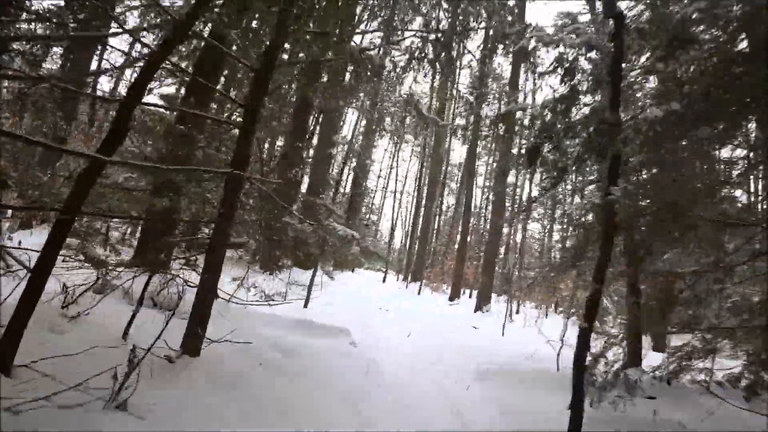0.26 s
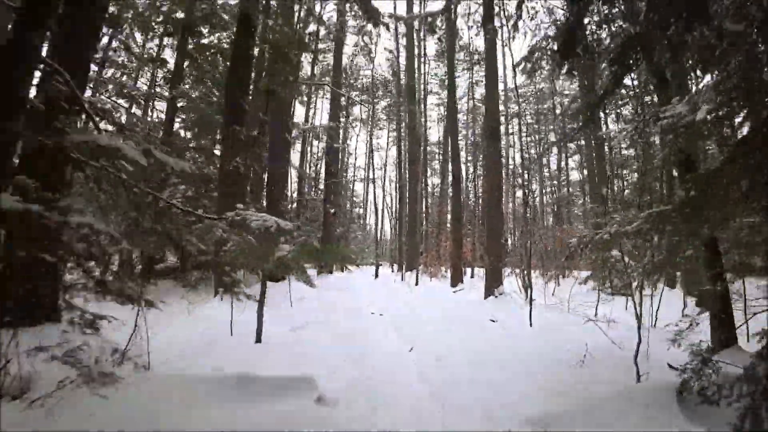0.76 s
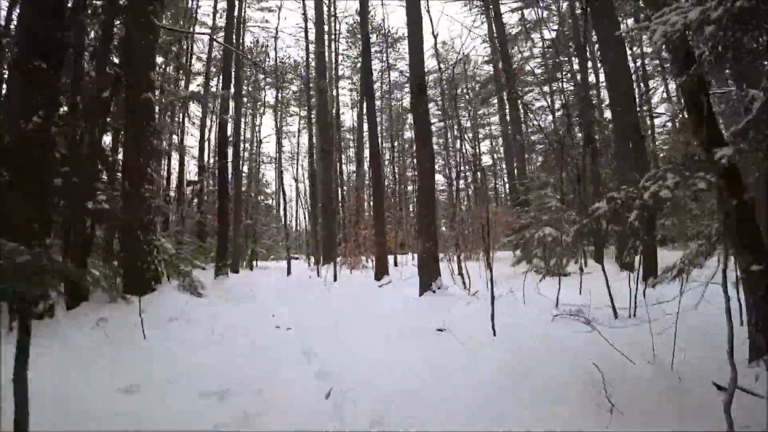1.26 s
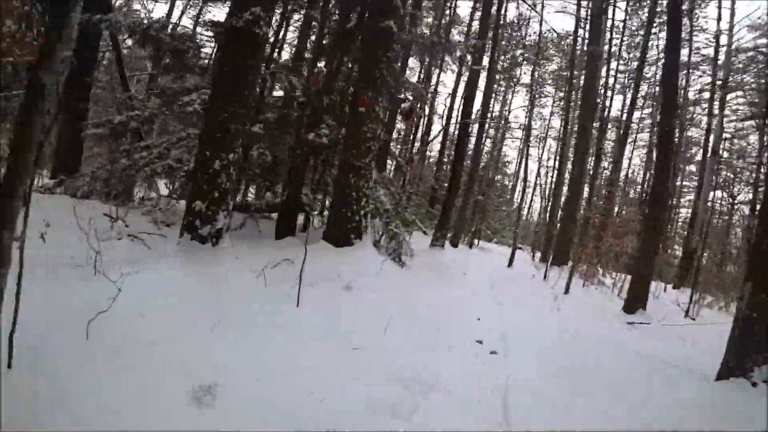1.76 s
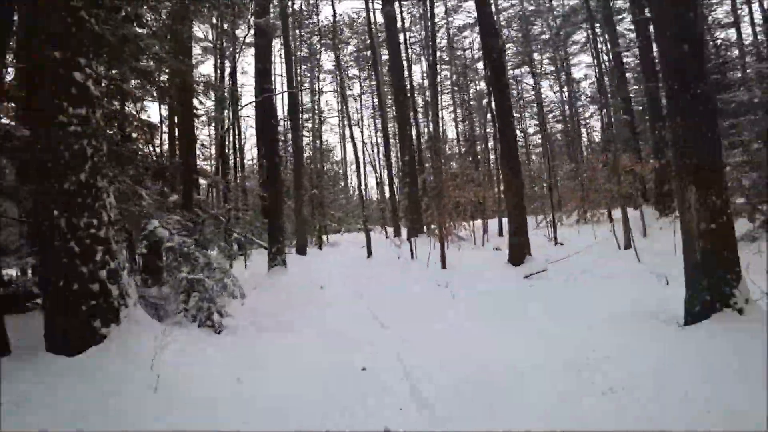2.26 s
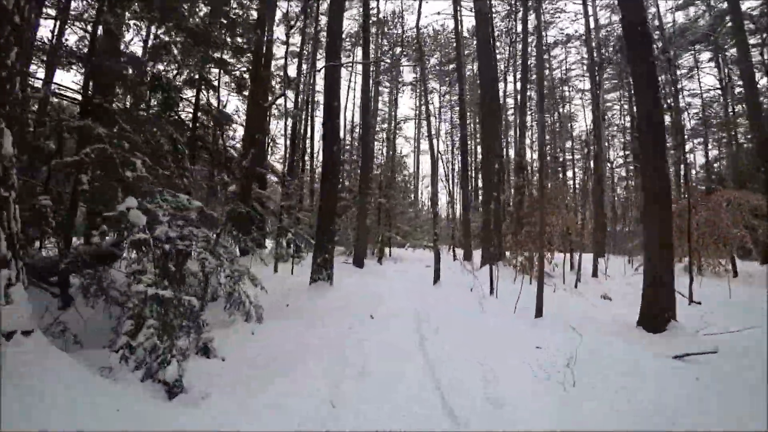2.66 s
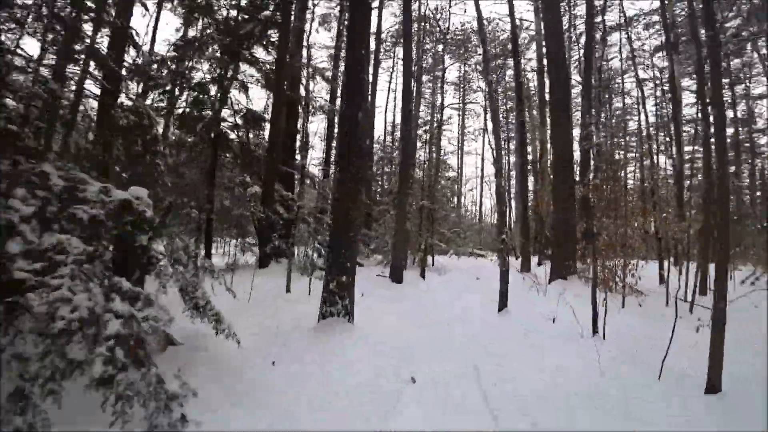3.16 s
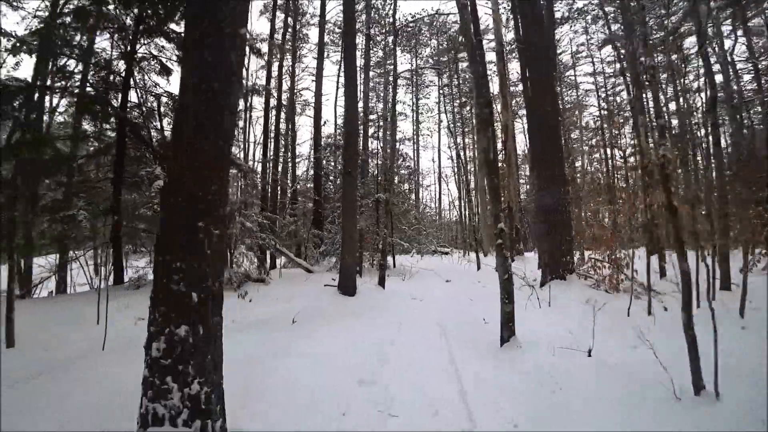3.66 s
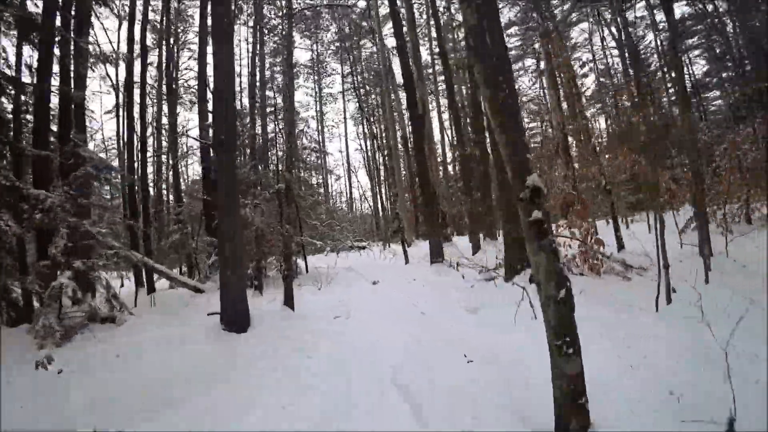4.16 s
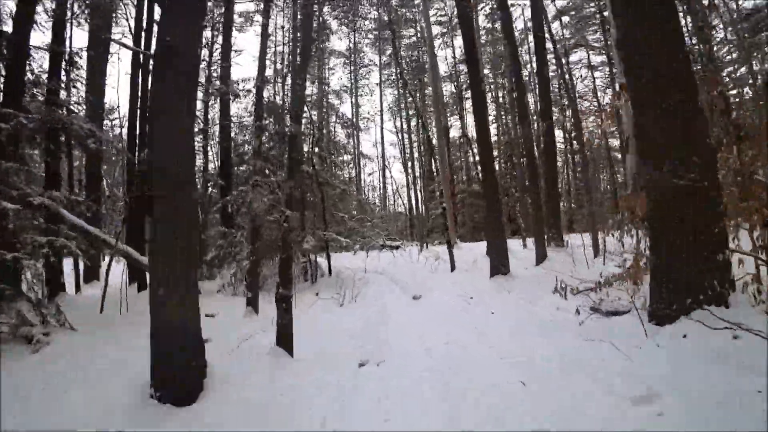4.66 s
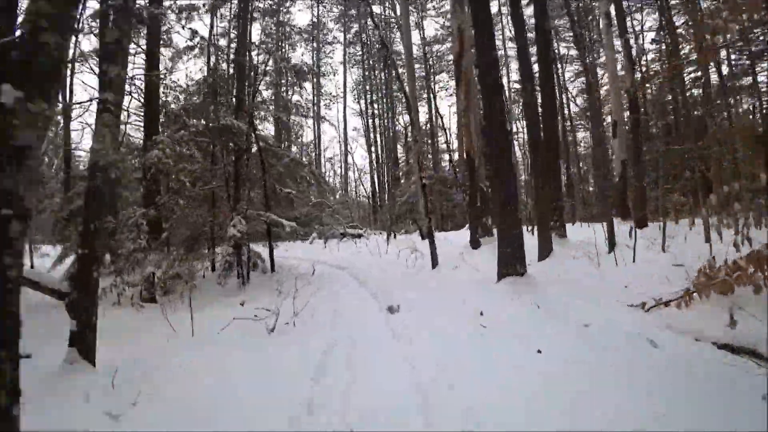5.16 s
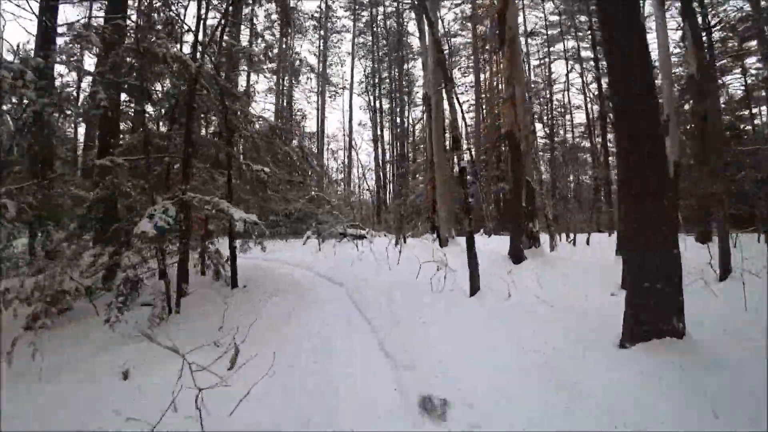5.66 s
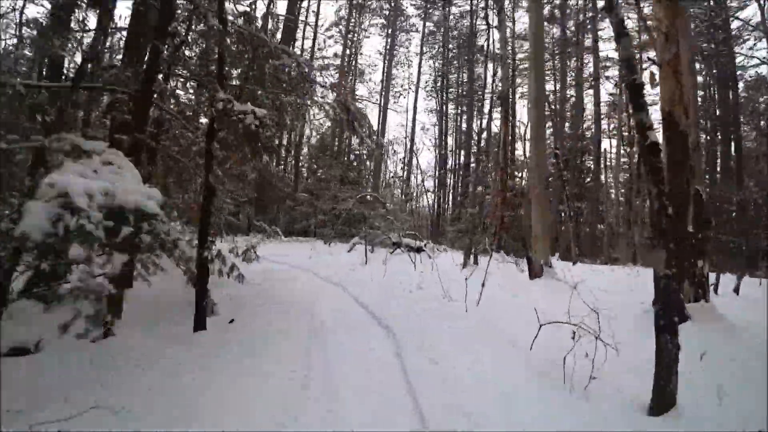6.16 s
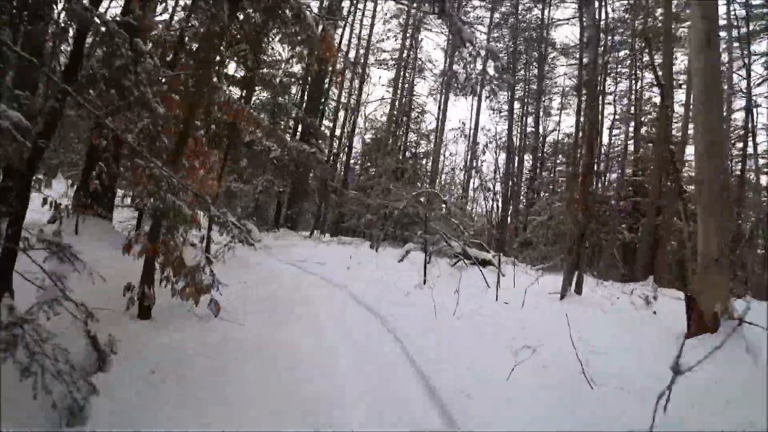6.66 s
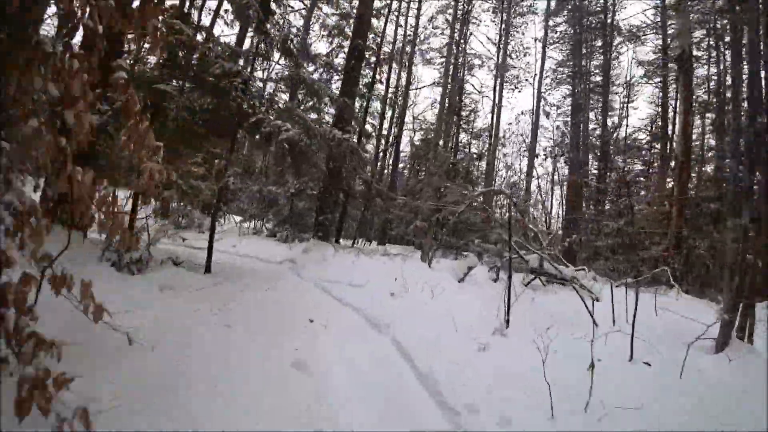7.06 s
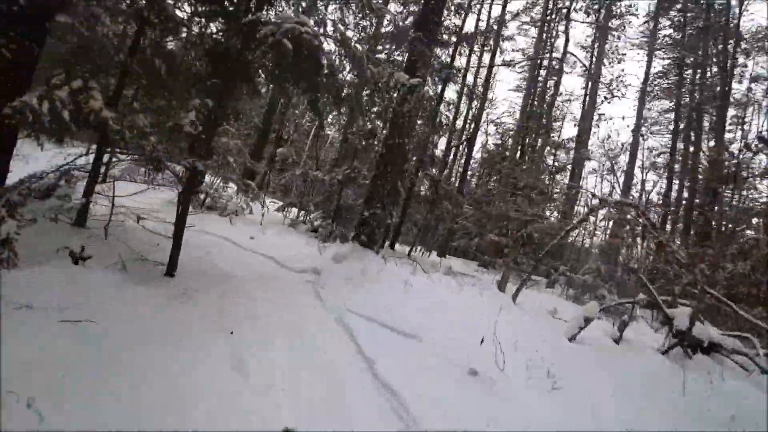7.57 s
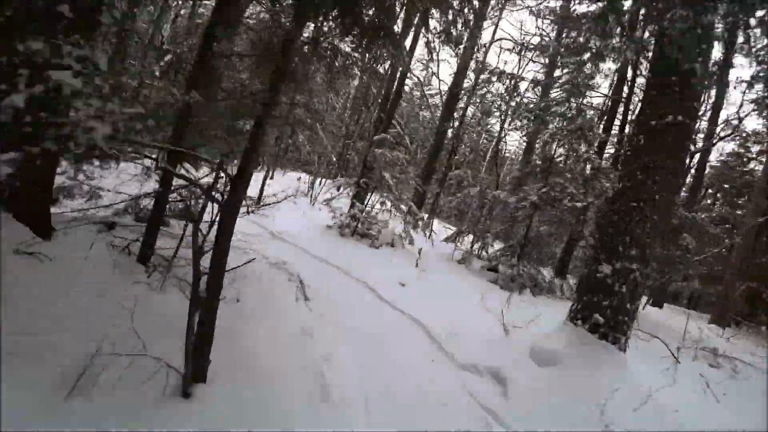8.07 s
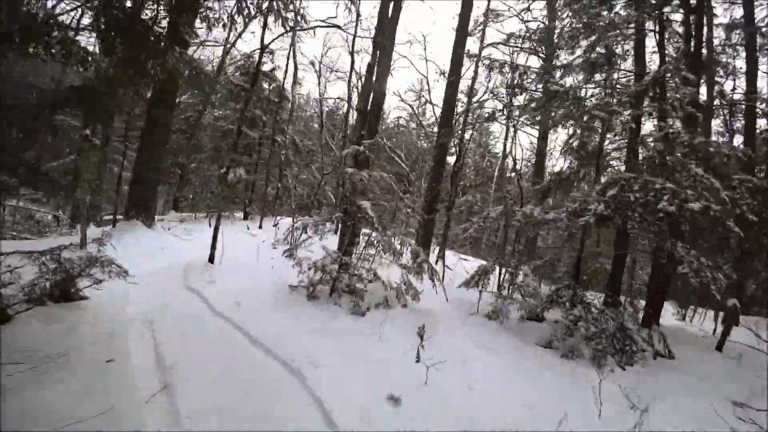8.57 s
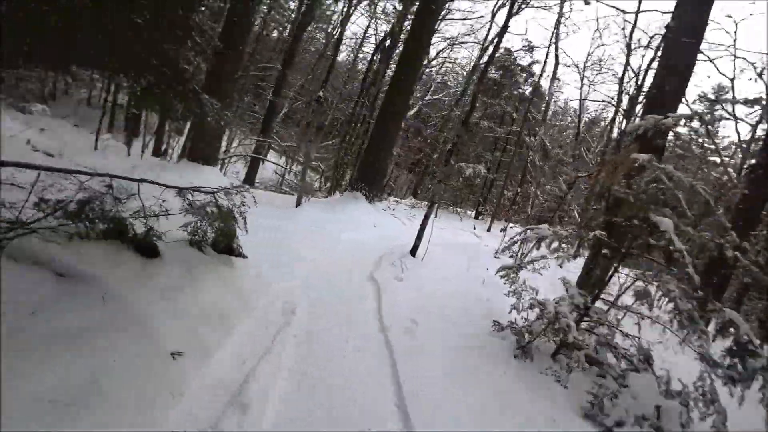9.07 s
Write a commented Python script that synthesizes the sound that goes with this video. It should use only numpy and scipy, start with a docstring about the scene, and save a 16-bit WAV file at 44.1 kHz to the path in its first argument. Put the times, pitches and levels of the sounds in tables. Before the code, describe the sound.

Close, frame-borne sound of a bike on a snowy forest trail: continuous heavy low rumble, irregular bumps and muffled crunch, rough where the loudest swings clip. A tiny squeak and scratch open it, followed by isolated knocks. Short bursts of even freewheel clicks appear in the second half, then steady brake friction with sharp gritty scratches, a short low groan and several final rattles.

```python
"""A bicycle rolls over packed snow, heard through a camera clamped to the frame, so metal carries nearly all sound.
All along, a deep note sways and snow thumps and crunches; noise shakes the ringing modes of the housing.
First the brake disc squeaks and grit scratches in short sine slips; then come knocks (noise bursts) and overloads.
From 4.2 to 7.5 s the freewheel ratchet clicks in even runs. From 7.5 s the brake rubs (noise through the housing);
grit scratches again at 8.1 s, the fork groans (a gliding sine) near 8.5 s, and knocks crowd the end."""
import sys
import numpy as np
from scipy import signal
from scipy.fft import rfft, irfft
from scipy.io import wavfile
from scipy.ndimage import uniform_filter1d, minimum_filter1d

SR = 44100
rng = np.random.default_rng(int(sys.argv[2]) if len(sys.argv) > 2 else 0)


def wav_out(sig):
    """Save sig, one row per channel (or a flat mono array), as 16-bit PCM at SR to the path in sys.argv[1]."""
    wavfile.write(sys.argv[1], SR, np.round(np.clip(np.atleast_2d(sig).T, -1, 1) * 32767).astype(np.int16))


N = 411012

# A short squeak of the disc. Each row: time in seconds, pitch in Hz, level in dB.
SQUEAK = [(0.05, 1047, -50), (0.07, 1040, -40), (0.1, 1054, -40), (0.145, 1060, -54)]
# Hiss of grit caught under the pad, one list per scratch.
# Each row: time in seconds, hiss in dB before flutter and the gains of each side.
GRIT_HISS = [
    [(0.06, -86), (0.106, -63), (0.11, -69), (0.18, -77)],
    [(8.08, -81), (8.114, -72), (8.134, -46.5), (8.158, -62), (8.298, -56), (8.316, -66), (8.4, -73)],
]
# Hard slips of the grit. Each row: start in seconds, peak in dB before the gains of each side, pitch in Hz.
GRIT_SLIPS = [(0.103, -50, 5840), (0.1351, -50, 5860), (8.1335, -38, 5850), (8.147, -45, 6430),
              (8.208, -39, 6200), (8.2167, -37, 6140), (8.2477, -41, 6240), (8.2885, -35, 6060),
              (8.2952, -41, 6160), (8.3584, -51, 6472)]
# Brake pad on the disc. Each row: time in seconds, rub in dB within the disc's band, before flutter and trim.
BRAKE_RUB = [(7.545, -88.5), (7.553, -57.5), (7.62, -54), (7.714, -53), (8.108, -54), (8.4, -52),
             (8.604, -52), (8.82, -52), (9.002, -56), (9.17, -63), (9.24, -86.5)]
# Bands the disc favours. Each row: centre in Hz, width in Hz, boost in dB before it adds to the plain path.
DISC_MODES = [(1950, 340, -4), (3330, 770, 4.5), (1100, 190, 2)]
# Extra drive of the first disc mode. Each row: time in seconds, drive in dB against the rub.
BRAKE_BITE = [(7.55, -2.5), (8.25, 3), (8.55, -11)]
# Throbs of the braked fork. Each row: time in seconds, pitch in Hz, level in dB before the gains of each side.
FORK_GROAN = [(8.44, 268.4, -50), (8.47, 268.8, -30), (8.49, 272, -17), (8.515, 272, -28.5),
              (8.54, 265, -16.5), (8.575, 280.6, -59), (8.615, 286, -10.5), (8.645, 286, -30),
              (8.68, 289, -64)]
# Runs of ratchet clicks. Each row: first click in seconds, last click in seconds, rough gap in seconds,
# peak in dB before scatter.
RATCHET_RUNS = [(4.182, 4.4157, .058, -41), (4.468, 4.569, .054, -44), (5.303, 5.415, .055, -38.5),
                (5.7154, 6.1669, .0501, -42.5), (6.538, 6.691, .051, -42), (7.316, 7.473, .0516, -41)]
# Knocks on the frame. Each row: start in seconds, peak in dB, body in dB against that peak, body pitch in Hz,
# edge in dB against that peak.
KNOCKS = [(0.203, -48, 5, 1110, -4), (0.242, -58, 11, 904, -10), (1.0052, -43.5, 15, 1105, -26),
          (1.0905, -56, 27.5, 980, -11), (1.1005, -61, 31, 800, -9), (1.1035, -59, 33, 950, -9),
          (1.109, -57, 36, 620, -17), (1.556, -41, 4, 1000, -14), (1.635, -38.5, 4, 999, -18),
          (1.686, -46, 3, 899, -8.5), (2.1949, -42, -1, 902, -23), (2.4352, -41.5, 6, 905, -40),
          (2.5262, -41.5, -3, 906, -13), (3.023, -35.5, 0, 900, -28), (3.4194, -38, -10, 897, -35.5),
          (3.5254, -31, 8.5, 860, -8.5), (3.9250, -31, -2, 1199, -7.5), (3.9315, -41, 5, 1095, -8),
          (4.4753, -37, 9.5, 900, -27), (5.0674, -48, -6, 1001, -5), (6.4366, -46, -3, 1097, -13),
          (7.528, -55, 23.5, 702.4, -21), (7.5522, -52.5, 7, 1020, -9), (7.741, -54, 12, 900, -16),
          (8.747, -40, 7, 942, -21), (8.766, -40, 15, 1046, -23.5), (8.793, -45, 18, 950, -23),
          (8.811, -42, 14, 1053, -18), (8.905, -48, 18, 982, -21), (9.126, -45.5, 12.5, 1216, -12),
          (9.139, -33, 9, 1030, -18.5), (9.1704, -43, 17.5, 888, 3), (9.2045, -46, 6, 895, -2),
          (9.218, -58, 0, 900, 1), (9.2618, -36.5, 9, 796.7, -17)]
# Sway of the clamp. Each row: time in seconds, level in dB before wavering, levelling off and the gains of each side.
SWAY_LEVEL = [(0.0, -15.5), (0.04, -38), (0.12, -13), (0.22, -21), (0.81, -25), (0.84, -15), (0.92, -27),
              (1.0, -18), (1.14, -21), (1.49, -13.5), (1.54, -22), (1.87, -6), (1.98, -24), (2.02, -12.5),
              (2.27, -10.5), (2.33, -22.5), (2.57, -19.5), (2.61, -21.5), (2.88, -10), (3.0, -16),
              (3.13, -20.5), (3.19, -13.5), (3.44, -15), (3.49, -28), (3.58, -33), (3.61, -13.5),
              (3.71, -33), (3.79, -9.5), (3.85, -29), (3.9, -15), (3.94, -22.5), (4.1, -14.5), (4.55, -26),
              (4.62, -9.5), (4.87, -14), (4.91, -26), (5.1, -10.5), (5.67, -18), (5.71, -25), (5.9, -16),
              (5.95, -25), (6.03, -17), (6.13, -22), (6.2, -14), (6.4, -19.5), (6.46, -10.5), (6.59, -21),
              (6.76, -10.5), (6.91, -35), (6.96, -16.5), (7.12, -6.5), (7.22, -27), (7.53, -11),
              (7.66, -16.5), (7.84, -25), (7.91, -18.5), (7.98, -32), (8.14, -14), (8.34, -17), (8.38, -11),
              (8.55, -29), (8.66, -14.5), (9.04, -9), (9.09, -21.5), (9.26, -13), (9.31, -13)]
# Pitch of the sway. Each row: time in seconds, pitch in Hz.
SWAY_PITCH = [(0.0, 34.9), (0.57, 39.95), (2.23, 41.22), (2.7, 44.19), (3.5, 40.11), (3.63, 36.5),
              (4.96, 42.12), (8.2, 39.11), (8.49, 40.99), (9.32, 41)]
# Roughness of the trail. Each row: time in seconds, then small lumps, long ripples and crunch,
# each in dB that count only against the other rows of their column.
TRAIL = [(0.0, -12.5, -29.5, -34.5), (0.15, -18, -24.5, -38.5), (0.26, -11.5, -24, -33.5),
         (0.54, -18.5, -29.5, -39.5), (0.68, -17.5, -19.5, -37), (0.78, -11.5, -25.5, -33),
         (1.04, -17.5, -30, -36), (1.47, -13.5, -19.5, -31.5), (1.55, -15, -21.5, -32),
         (1.78, -12.5, -18, -34.5), (1.82, -19, -23, -39.5), (1.95, -18, -25, -36),
         (2.14, -15.5, -20.5, -35.5), (2.57, -16.5, -23, -37), (3.22, -15, -18, -34),
         (3.27, -10.5, -18.5, -32), (3.5, -17.5, -26, -34.5), (3.73, -15, -25, -32),
         (3.81, -15.5, -19.5, -32.5), (3.96, -16.5, -23, -33), (4.09, -11, -19, -31.5),
         (4.29, -19.5, -21.5, -34), (4.44, -14.5, -23, -32.5), (4.63, -10, -15.5, -31.5),
         (4.7, -17.5, -17.5, -35), (4.87, -15.5, -24.5, -34.5), (4.97, -11.5, -14.5, -31.5),
         (5.06, -12.5, -19, -35.5), (5.13, -18.5, -27, -37.5), (5.22, -20.5, -23.5, -36),
         (5.35, -13.5, -16.5, -34.5), (5.49, -12.5, -17, -33), (5.71, -14.5, -22.5, -37),
         (5.88, -13, -13.5, -31.5), (6.08, -11.5, -22.5, -37), (6.27, -10.5, -14.5, -29),
         (6.39, -13.5, -23.5, -37), (6.56, -11.5, -15, -32.5), (6.61, -11, -21, -30.5),
         (6.74, -13.5, -15.5, -32), (6.88, -16, -26.5, -33), (6.99, -9, -18.5, -30), (7.16, -21, -23, -38),
         (7.22, -20, -29.0, -36.5), (7.33, -11, -20.5, -34), (7.57, -17.5, -18.5, -34.5),
         (7.83, -14, -19, -32.5), (7.92, -17, -14.5, -36), (7.97, -19.5, -17.5, -34),
         (8.14, -12.5, -19.5, -30), (8.38, -16.5, -20.5, -31), (8.48, -9, -21.5, -29),
         (8.55, -12, -30, -27.5), (8.65, -9, -22.5, -28), (8.81, -15, -20, -29), (8.99, -16.5, -23.5, -35),
         (9.13, -17, -18.5, -34), (9.2, -15, -22, -36.5), (9.26, -6.5, -21.5, -34.5),
         (9.31, -9, -25, -32.5)]
# Ringing modes of the housing. Each row: centre in Hz, width in Hz before a common widening, left level in dB per Hz,
# right level in dB per Hz, lead of the right side in radians, likeness of the two sides from 0 to 1.
HOUSING_MODES = [(56.2, 22, -41.5, -40, -2, 0.1), (121, 39.5, -46, -38.5, -3, 0.83),
                 (182.6, 50.0, -43, -40, -2.5, 0.77), (230, 37, -40.5, -34.5, -3, 0.93),
                 (267.8, 47.4, -35, -32, -2.5, 0.99), (296.7, 44, -38.5, -35.5, -3, 0.95),
                 (375.5, 56, -55.5, -53, -3, 0.4), (458, 120, -67, -60, -3, 0.6),
                 (557.2, 84, -66.5, -56, -2.5, 0.4), (618.3, 81, -63, -55.5, -3, 0.7),
                 (818.6, 120, -67, -66.5, -2, 0.64), (873.5, 85, -60, -61, 3, 0.78),
                 (1035, 139, -67, -67.5, -1.5, 0.21), (1311, 100, -74.5, -69, 4, 0.89),
                 (1470, 250, -82, -82.5, -2, 0.6), (1751, 89, -76.5, -82.5, -2, 0.95),
                 (1870, 140, -77, -75, -2, 0.9), (2090, 500, -91.5, -93, -1.74, 0.9),
                 (2490, 170, -91, -90.5, -1.2, 0.95), (3095, 140, -99.5, -99.5, -0.5, 0.7),
                 (3413, 290, -99.2, -99.2, 0.1, 0.5), (3680, 150, -99.4, -101, 0.5, 0.7),
                 (4480, 160, -115.1, -113.7, -2, 0.93), (5170, 900, -117, -114.5, -4, 0.8),
                 (6430, 1600, -126, -121, 0.6, 0.5)]
# Rumble crests that reach or near overload, one list for the left side and one for the right.
# Each row: rough time of the crest in seconds, its size in dB over full scale.
OVERLOAD_CRESTS = [
    [(1.486, 2), (1.691, 0.5), (1.794, 0.7), (2.947, 0.5), (3.298, 0.3), (4.077, 1), (4.090, 2),
     (4.098, 0.4), (4.18, 0.5), (5.068, 0.2), (5.320, 0.4), (5.329, 0), (5.362, 1.4), (5.381, -0.8),
     (5.505, 0.5), (6.446, -1.5), (6.708, -1.3), (6.765, 0.6), (6.774, 1.8), (6.778, 0.8), (7.055, 0.7),
     (8.388, -0.7), (8.793, 1.5)],
    [(0.204, 1), (0.2085, 1.5), (1.448, 0.3), (1.607, 1), (1.750, 0.5), (1.764, 2.5), (2.923, 1.5),
     (3.253, 0.5), (3.267, 1.5), (3.283, 1.6), (3.309, 1.5), (3.785, 2.3), (3.816, 2), (4.063, 0.4),
     (4.083, 0.1), (4.138, 1.8), (4.615, 2.2), (5.077, 1), (5.085, -0.6), (5.134, 1), (5.520, 1.5),
     (5.617, 0.4), (5.681, 0.5), (5.826, 1), (6.173, 1), (6.243, 1), (6.249, 1), (6.342, 1), (6.359, 2.5),
     (6.481, 0), (6.503, 2.5), (6.514, 1.2), (6.539, 0.5), (6.546, 3), (6.569, 1), (6.992, 0), (7.004, 0.9),
     (7.102, 0.3), (7.44, 0.4), (7.921, -0.5), (8.482, 1), (8.673, 3), (8.678, 1.3), (8.686, 0.9),
     (8.726, 1.5), (8.730, 2.4), (8.734, -0.5), (8.823, 0.3), (8.827, 1), (9.072, 1.5), (9.131, 1.5),
     (9.274, 1.5), (9.277, 1), (9.282, 0.5)],
]

T = np.arange(N) / SR
SIZE = 4096 * 108  # length of the long filters, in samples
HZ = np.arange(SIZE // 2 + 1) * SR / SIZE
RIPPLE_TOP_HZ, BUMP_TOP_HZ = 200, 420  # upper ends of the low and middle housing modes

HISS_DB, SPRAY_DB = -74.5, -74
DISC_BAND_HZ = 2900, 3800
BRAKE_TILT_DB = 7  # per octave
BRAKE_TOP_DB = -1.5  # reached 250 Hz above the disc's band, then held
PAWL_BODY_DB, PAWL_BODY_HZ, PAWL_EDGE_DB, PAWL_SCATTER_DB = 0.5, 990, -29.5, 2
KNOCK_TILT_DB = 4.5  # per octave
BODY_WIDTH_HZ, BODY_LEAD_RAD = 600, -1.3  # the lead is that of the right capsule
SWAY_LEFT_DB, SWAY_RIGHT_DB, SWAY_LEAD_RAD, SWAY_LOOSE_DB = 3, -2.5, -0.56, -3.5
SWAY_WAVER, SWAY_WAVERS_PER_S = .25, 18
SWAY_WIDEST_DB = -9.5  # the swing levels off near here
PATCH_DB, PATCHES_PER_S = 1.13, 14  # lumps come in random patches
GRAINS_PER_S = 260
LIMIT_LEVEL = 0.95  # share of full scale
PUSH_SPREAD_S = .0026
TOP_HZ = 11000
KNEE = 95  # the larger, the sharper the corner of the overload


def undb(db):
    """Turn dB into a plain gain."""
    return 10 ** (np.asarray(db) / 20)


def track(table, silent=False):
    """Columns of a table at every sample; silent: the last column (dB) is off outside the table."""
    s, *columns = np.transpose(table)
    out = [np.interp(T, s, c) for c in columns]
    if silent:
        out[-1][(T < s[0]) | (T > s[-1])] = -200
    return out


def noise():
    """White noise for the whole scene."""
    return rng.standard_normal(N)


def noise_pair():
    """Separate white noise for the left and right sides."""
    return np.array([noise(), noise()])


def unit(x):
    """Scale to an average strength (rms) of 1."""
    return x / np.sqrt(np.mean(x ** 2))


def walk(rate):
    """Random levels held for 1 / rate seconds, with smoothed steps and strength 1."""
    k = int(SR / rate)
    steps = np.repeat(rng.standard_normal(N // k + 1), k)
    return unit(uniform_filter1d(steps, k)[:N])


def ring(hz, width):
    """Response of a resonance applied twice, gain 1 at the centre."""
    return 1 / (1 + 2j * (HZ - hz) / width) ** 2


def through(x, response):
    """Pass a sound through a frequency response."""
    return irfft(rfft(x, SIZE) * response, SIZE)[..., :N]


def tone(table):
    """A sine along rows of (s, Hz, dB), its level smoothed over 5 ms."""
    hz, db = track(table, silent=True)
    level = uniform_filter1d(undb(db), SR // 200)
    return np.sqrt(2) * level * np.sin(2 * np.pi * np.cumsum(hz) / SR)


def housing():
    """Low, middle and upper ringing modes, each answering an upright push, a sideways push and separate rattles."""
    paths = np.zeros((3, 3, 2, len(HZ)), complex)
    for k, (hz, width, left_db, right_db, lead, like) in enumerate(HOUSING_MODES):
        sides = np.array([[undb(left_db)], [undb(right_db) * np.exp(1j * lead)]])
        mode = np.sqrt(SR / 2) * ring(hz, 1.32 * width) * sides
        group = paths[int(hz > RIPPLE_TOP_HZ) + int(hz > BUMP_TOP_HZ)]
        # modes take turns between the upright and the sideways push
        group[k % 2] += np.sqrt(like) * mode
        group[2] += (-1) ** k * np.sqrt(1 - like) * mode
    return paths


def shake(effort, paths):
    """Noise forces that share one effort curve ring the modes."""
    upright = through(effort * noise(), paths[0])
    sideways = through(effort * noise(), paths[1])
    own_rattle = through(effort * noise_pair(), paths[2])
    return upright + sideways + own_rattle


def hiss():
    """Steady, faint white noise, separate on each side."""
    return undb(HISS_DB) * noise_pair()


def squeak():
    """The disc sings briefly on one mode: a gliding sine."""
    return tone(SQUEAK)


def grit():
    """Scratchy hiss near 6 kHz with hard slips, louder on the right; its separate thin top is stronger on the left."""
    effort = sum(undb(track(part, silent=True)[0]) for part in GRIT_HISS) * undb(4.2 * walk(200))
    colour = ring(6200, 1800) + undb(-5) * ring(3700, 2000)
    scratch = effort * unit(through(noise(), colour))
    t = np.arange(int(.02 * SR)) / SR
    for s, db, hz in GRIT_SLIPS:
        i = int(s * SR)
        scratch[i:i + len(t)] += undb(db) * np.exp(-t / 0.0013) * np.sin(2 * np.pi * hz * t)
        # each slip also lifts the thin top for a few ms
        effort[i:i + len(t)] += undb(db - 14.0) * np.exp(-t / 0.0046)
    top_colour = np.abs(ring(10600, 2000)) + undb(-3.0) * np.abs(ring(7400, 4000))
    top = effort * unit(through(noise_pair(), top_colour))
    late = np.roll(scratch, 2)  # two samples later on the right
    left = undb(2.0) * scratch + undb(-4.5) * top[0]
    right = undb(6.0) * late + undb(-12.0) * top[1]
    return np.array([left, right])


def brake(high):
    """Even, bright friction noise rings the upper modes; the disc favours a few bands."""
    tilt_db = BRAKE_TILT_DB * np.log2(np.clip(HZ, 300, 5200) / 3300)
    top_db = BRAKE_TOP_DB * np.clip((HZ - DISC_BAND_HZ[1]) / 250, 0, 1)
    disc = 1 + sum(undb(db) * np.abs(ring(hz, width)) for hz, width, db in DISC_MODES)
    paths = high * undb(tilt_db + top_db) * disc
    band = (HZ > DISC_BAND_HZ[0]) & (HZ < DISC_BAND_HZ[1])
    # rms that a unit force leaves in that band
    reach = np.sqrt(np.sum(np.abs(paths[..., band]) ** 2) / (2 * len(HZ)))
    rub = undb(track(BRAKE_RUB, silent=True)[0] + 1.2 * walk(90) + 1.5 * walk(20))
    bite_effort = rub * undb(track(BRAKE_BITE)[0])
    bite = shake(bite_effort, paths * ring(*DISC_MODES[0][:2]) / reach)
    return undb(0.5) * shake(rub, paths / reach) + bite


def groan():
    """The braked fork's sine rocks the capsules against each other, the right one more."""
    return tone(FORK_GROAN) * np.array([[-undb(-15.0)], [undb(12.5)]])


def ratchet_clicks():
    """Pawls click evenly in each run, uneven in strength; rows are laid out like the knocks."""
    rows = []
    for first, last, gap, db in RATCHET_RUNS:
        count = round((last - first) / gap) + 1
        rows += [(s, db) for s in np.linspace(first, last, count)]
    scatter = PAWL_SCATTER_DB * rng.standard_normal((len(rows), 2))
    return [(s, db + peak, PAWL_BODY_DB + body, PAWL_BODY_HZ, PAWL_EDGE_DB)
            for (s, db), (peak, body) in zip(rows, scatter)]


def knocks(high):
    """Short noisy blows, ratchet clicks included, ring the upper modes and a hollow body, with a bright edge."""
    step = SIZE // 4096  # a coarse frequency grid is enough for short blows
    both = (high[0] + high[1] + high[2])[:, ::step]
    hz = HZ[::step]
    count = 2 * (len(hz) - 1)
    t = np.arange(count) / SR
    hard = undb(KNOCK_TILT_DB * np.log2(np.clip(hz, 450, 5000) / 2000))
    centre = np.clip(1 - np.abs(np.log2((hz + 1) / 1900)) / 1.1, 0, 1)
    edge = (1 - centre) * (hz > 1900) / (1 + (hz / 5200) ** 8)
    body_sides = np.array([[1], [np.exp(1j * BODY_LEAD_RAD)]])
    blows = KNOCKS + ratchet_clicks()
    fade = np.exp(-t / 0.0011) + 0.28 * np.exp(-t / 0.0086)
    bursts = rng.standard_normal((len(blows), count)) * fade
    out = np.zeros((2, N + count))
    for (s, db, body_db, body_hz, edge_db), burst in zip(blows, bursts):
        i = int(s * SR)
        hollow = body_sides / (1 + 2j * (hz - body_hz) / BODY_WIDTH_HZ) ** 4
        bands = [both * hard * centre, hollow, both * hard * edge]
        gains = undb([db, db + body_db, db + edge_db])
        for band, gain in zip(bands, gains):
            part = irfft(rfft(burst) * band)
            out[:, i:i + count] += gain * part / np.abs(part.mean(axis=0)).max()
    return out[:, :N]


def sway():
    """The clamp swings as a deep sine over a broad heave that follows the ripples, plus a wobble separate on each side."""
    (hz,), (db,) = track(SWAY_PITCH), track(SWAY_LEVEL)
    waver = walk(SWAY_WAVERS_PER_S) + 1j * walk(SWAY_WAVERS_PER_S)
    db = db + 20 * np.log10(np.abs(1 + SWAY_WAVER * waver))
    db = db - 5 * np.log10(1 + undb(4 * (db - SWAY_WIDEST_DB)))  # level off the widest swings
    turn = 2 * np.pi * np.cumsum(hz) / SR
    heave = undb(-26) * unit(through(noise(), ring(36, 49))) * unit(undb(track(TRAIL)[1]))
    swing = undb(db) * np.sqrt(2)
    left = swing * np.sin(turn) + heave
    right = swing * np.sin(turn + SWAY_LEAD_RAD) + heave
    wobble = unit(through(noise_pair(), ring(40, 27)))
    loose = undb(SWAY_LOOSE_DB + .5 * db - 11.5) * wobble
    return np.array([undb(SWAY_LEFT_DB) * left, undb(SWAY_RIGHT_DB) * right]) + loose


def tyres(low, middle, high):
    """Ripples and lumps thump the lower modes; snow crushes in bursts and cracks in single grains, and sprays."""
    lumps_db, ripples_db, crunch_db = track(TRAIL)
    lumps = walk(30)
    ripple_effort = unit(undb(ripples_db + 1.7 * lumps))
    lump_effort = unit(undb(lumps_db + 0.5 * lumps + PATCH_DB * walk(PATCHES_PER_S)))
    thump = shake(ripple_effort, low) + shake(lump_effort, middle)
    bursts_db = 1.3 * walk(30) + 1.8 * walk(9) + 3.0 * np.maximum(walk(60), 0) + 0.15 * lumps
    effort = unit(undb(crunch_db + bursts_db))
    grain_size = undb(4.2 * np.minimum(rng.exponential(size=N), 3))
    cracks = (rng.random(N) < GRAINS_PER_S / SR) * grain_size
    # a grain gives way over a millisecond or two
    cracks = signal.lfilter([1], [1, -np.exp(-1 / (.0015 * SR))], unit(cracks * undb(crunch_db)))
    bright = undb(2.0 * np.log2((HZ + 1) / 1500))
    crush = shake(undb(-1.5) * effort, high)
    crackle = shake(undb(-3.5) * unit(cracks), high * bright)
    spray = unit(through(noise_pair(), ring(4200, 8100))) * effort
    return thump + crush + crackle + undb(SPRAY_DB) * spray


def limiter(rumble):
    """A level limiter eases down the loudest swings, so the steady rumble levels off."""
    span = SR // 80
    loudest = -minimum_filter1d(-np.abs(rumble).max(axis=0), 2 * span)  # widest swing nearby
    gain = np.minimum(1, LIMIT_LEVEL / loudest)
    return rumble * uniform_filter1d(uniform_filter1d(gain, span), span)


def overload_crests(rumble, middle):
    """In turn, each listed crest is brought to its own size by a short ring of the middle modes on both sides."""
    reply = irfft(middle[0] + middle[1], SIZE)[:, :SR // 10]
    top = np.argmax(np.abs(reply[1]))
    # a short bell-shaped window keeps each push to a swing or two
    reply = reply * np.exp(-.5 * ((np.arange(SR // 10) - top) / (PUSH_SPREAD_S * SR)) ** 2)
    out = rumble.copy()
    in_turn = sorted((s, db, side) for side, rows in enumerate(OVERLOAD_CRESTS) for s, db in rows)
    for s, db, side in in_turn:
        near = int(s * SR) - 50
        at = near + np.argmax(np.abs(out[side, near:near + 100]))
        push = (undb(db) * np.sign(out[side, at]) - out[side, at]) / reply[1, top]
        stretch = out[:, at - top:at - top + reply.shape[1]]
        # swap the sides for a crest on the left
        pushed = reply if side else reply[::-1]
        stretch += push * pushed[:, :stretch.shape[1]]
    return out


def scene():
    """The rumble is limited and its listed crests are set; the other sounds are added on top."""
    low, middle, high = housing()
    details = hiss() + squeak() + grit() + brake(high) + knocks(high)
    rumble = limiter(groan() + sway() + tyres(low, middle, high))
    return details + overload_crests(rumble, middle)


def record(dry):
    """The input flattens at full scale with a slightly rounded corner; then the top is cut."""
    flat = dry / (1 + np.abs(dry) ** KNEE) ** (1 / KNEE)
    top_cut = signal.ellip(8, .05, 60, TOP_HZ, fs=SR, output="sos")
    return signal.sosfilt(top_cut, flat)


dry = scene()
out = record(dry)
wav_out(out)
```